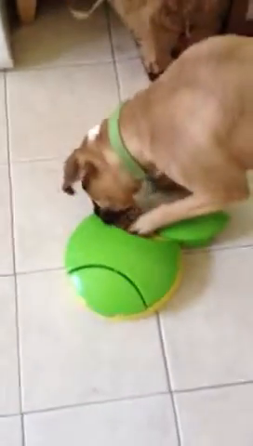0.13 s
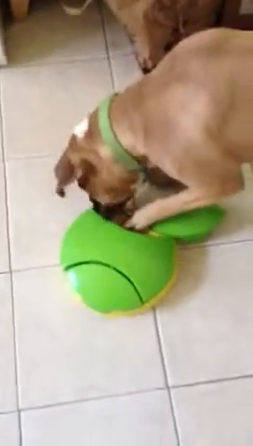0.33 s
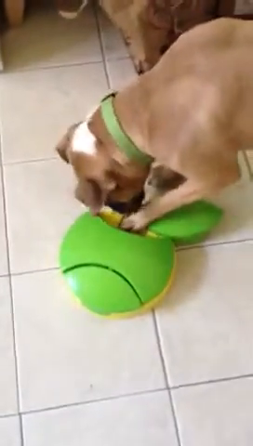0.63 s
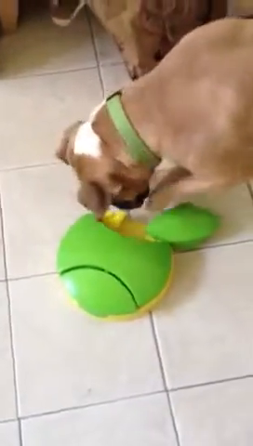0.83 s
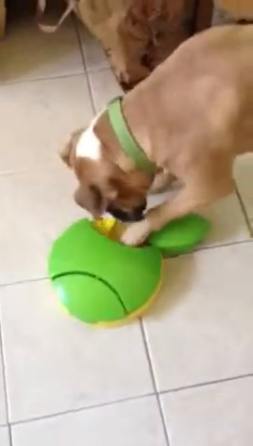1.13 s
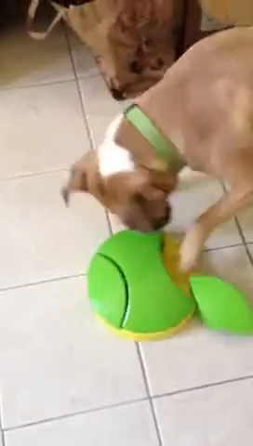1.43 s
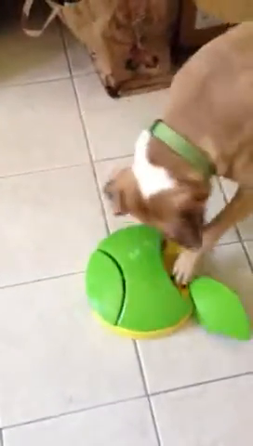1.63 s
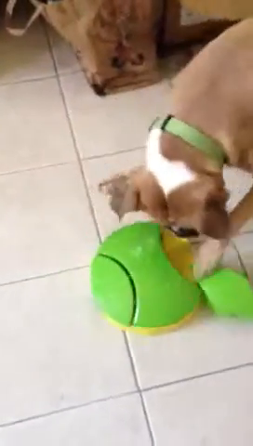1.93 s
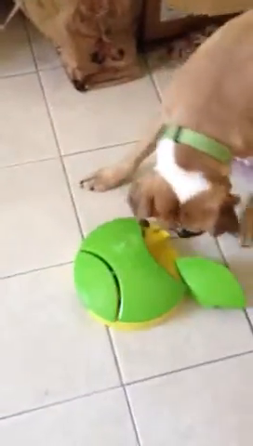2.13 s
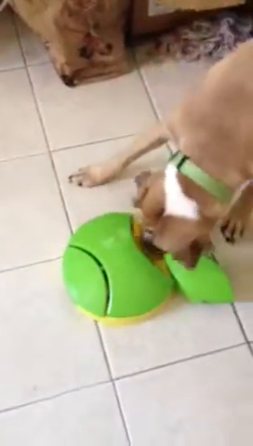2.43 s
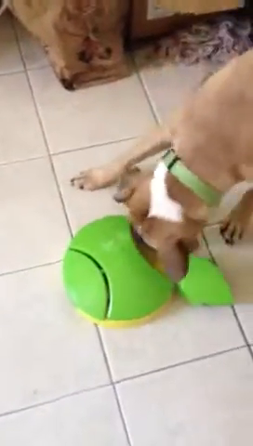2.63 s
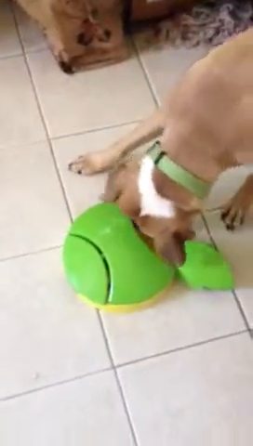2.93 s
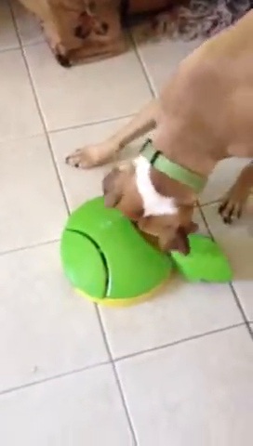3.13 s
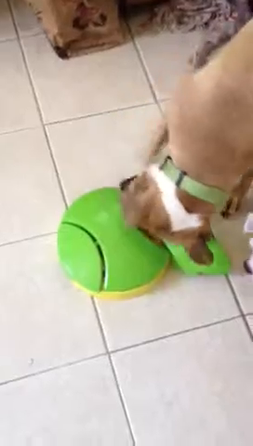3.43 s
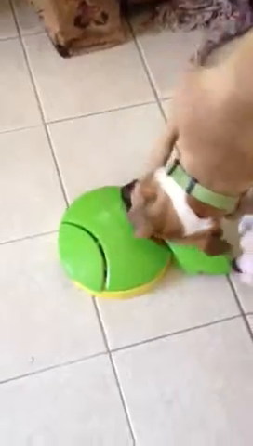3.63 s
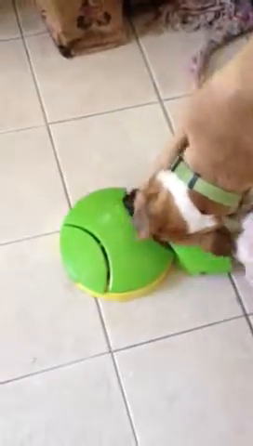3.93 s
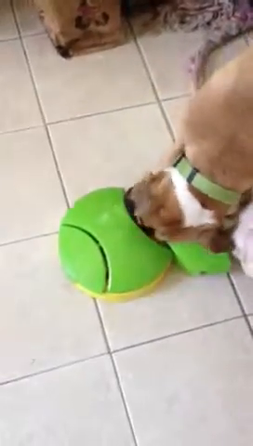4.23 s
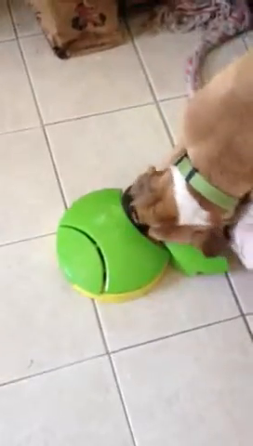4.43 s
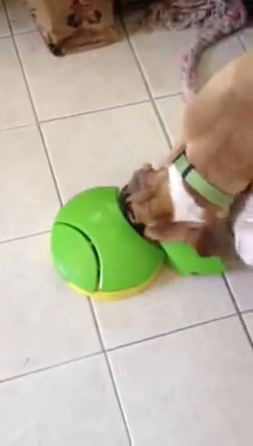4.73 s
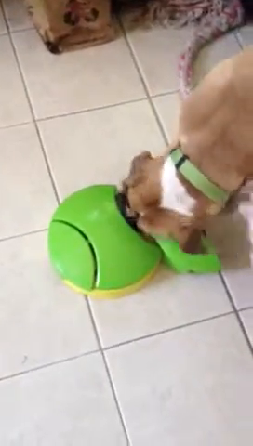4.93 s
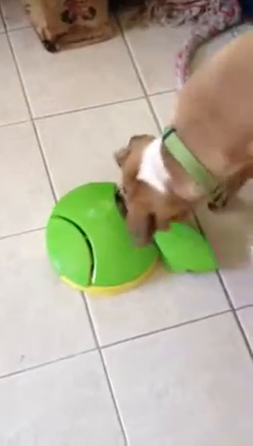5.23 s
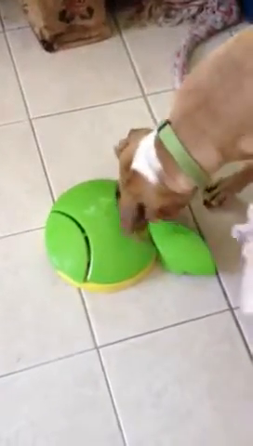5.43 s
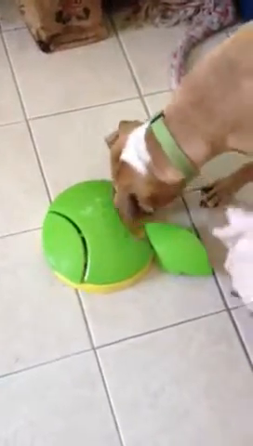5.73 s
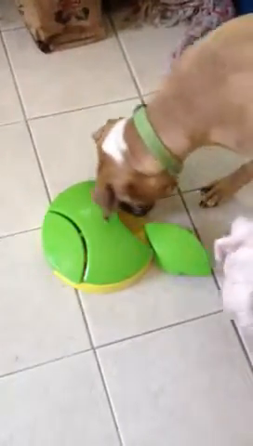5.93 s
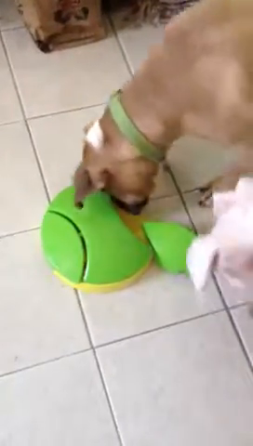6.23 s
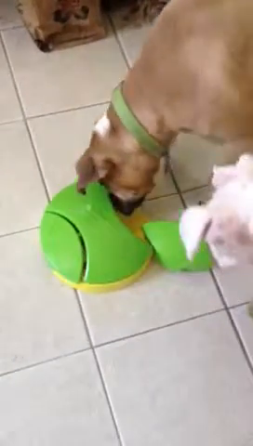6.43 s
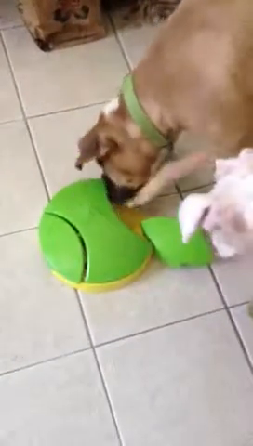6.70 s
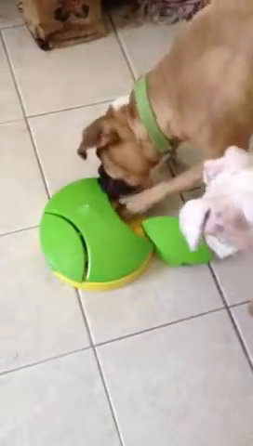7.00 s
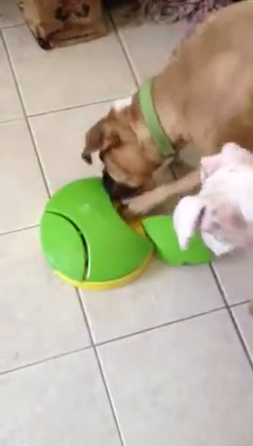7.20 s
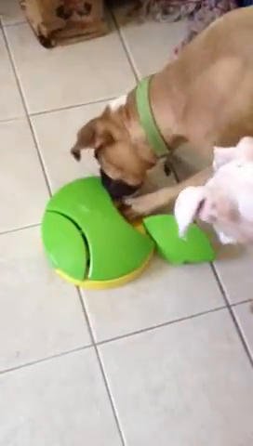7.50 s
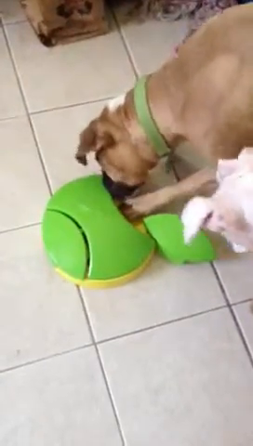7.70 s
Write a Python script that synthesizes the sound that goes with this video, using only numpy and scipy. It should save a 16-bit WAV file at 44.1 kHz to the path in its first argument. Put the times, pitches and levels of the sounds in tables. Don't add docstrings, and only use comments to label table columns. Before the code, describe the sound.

Sharp plastic knocks, claw ticks and gritty rubbing from a dog working a hollow toy on tiles, with faint collar tinkles and lively room echo.

```python
import sys
import numpy as np
from scipy import signal
from scipy.io import wavfile
from scipy.ndimage import uniform_filter1d

SR = 44100
rng = np.random.default_rng(int(sys.argv[2]) if len(sys.argv) > 2 else 0)


def to_wav(sig):
    pcm = np.clip(np.atleast_2d(sig), -1, 1) * 32767
    pcm = np.round(pcm).astype(np.int16)
    wavfile.write(sys.argv[1], SR, pcm.T)


def amp(db):
    return 10 ** (np.asarray(db, float) / 20)


N = 346626


def at_hz(points, hz):
    table_hz, values = np.transpose(points)
    return np.interp(np.log(hz), np.log(table_hz), values)


def rms_one(x):
    return x / np.sqrt(np.mean(x ** 2) + 1e-20)


def start_one(x):
    return x / np.sqrt(np.mean(x[:, :SR * 3 // 100] ** 2, axis=1, keepdims=True))


def band(x, low_hz, high_hz):
    return signal.sosfilt(signal.butter(2, [low_hz, high_hz], "band", fs=SR, output="sos"), x)


def thirds(low_hz, high_hz):
    count = round(3 * np.log2(high_hz / low_hz))
    edges = np.geomspace(low_hz, high_hz, count + 1)
    return zip(edges, edges[1:])


def drift(rate):
    knots = rng.standard_normal(N // 100)
    return np.interp(np.arange(N) / SR * 2 * rate, np.arange(len(knots)), knots)


def swells(middle_s, length_s, db):
    now = np.arange(0, N + 64, 64) / SR
    shape = np.exp(-4 * ((now - middle_s[:, None]) / length_s[:, None]) ** 2)
    return np.interp(np.arange(N) / SR, now, amp(db) @ shape)


def coloured(spectrum, low_hz, high_hz, patchy_db, grain_db):
    white = rng.standard_normal((2, N)) * amp(grain_db * drift(130))
    out, together = 0, drift(7.6)
    for k, (lo, hi) in enumerate(thirds(low_hz, high_hz)):
        flicker_db = patchy_db * (together + 1.2 * drift(9.9))
        gain = amp(at_hz(spectrum, np.sqrt(lo * hi)) + flicker_db)
        out = out + gain * band(white[k % 2], lo, hi)
    return rms_one(out)


def ring(x, hz, t60):
    radius = amp(-60 / (t60 * SR))
    turn = 2 * np.pi * hz / SR
    return signal.lfilter([0, np.sin(turn)], [1, -2 * radius * np.cos(turn), radius * radius], x + 1e-18)


def rings(rows, shake_s, split):
    out, t = np.zeros(N + SR), np.arange(SR // 2) / SR
    jiggle = np.sin(np.pi * np.minimum(t / shake_s, 1)) ** 2
    for s, db, hz, t60 in rows:
        shake = jiggle / jiggle.sum() * 2 * np.sin(2 * np.pi * hz * t)
        pair = ring(shake, hz, t60) + 0.69 * ring(shake, hz * (1 + split), t60)
        start = round(s * SR)
        out[start:start + len(t)] += amp(db) * pair
    return out[:N]


# pitch_hz, level_db (per Hz)
AIR_SPECTRUM = [(18, -61), (30, -18), (64, -42.5), (116, -6.5), (285, 1.5), (404, -14), (457, -4),
                (608, -8), (1170, -10), (1350, -16), (1910, -17), (2400, -22), (4000, -21), (5200, -51),
                (8800, -120)]
# pitch_hz, width_hz, level_db
MOTOR_HUM = [(119.8, 4.8, -78), (177.8, 9.1, -76), (290.5, 5.2, -71.5), (357.5, 4.4, -75)]


def room_tone():
    out = amp(-64) * coloured(AIR_SPECTRUM, 30.2, 1295, patchy_db=1.0, grain_db=0.3)
    for hz, width_hz, db in MOTOR_HUM:
        out += amp(db) * rms_one(ring(rng.standard_normal(N), hz, 3.8 / width_hz))
    return out


# middle_s, length_s, level_db
FINGER_SHIFTS = [(.01, 0.13, -61.5), (0.577, .07, -66), (.47, .08, -70), (0.725, 0.165, -59),
                 (.88, .1, -72), (1.02, 0.077, -63.5), (1.186, 0.061, -59), (1.75, 0.057, -68),
                 (1.55, .4, -86), (2.147, 0.079, -72), (2.565, 0.086, -74)]


def handling():
    rumble = rms_one(band(rng.standard_normal(N), 74, 190))
    return swells(*np.transpose(FINGER_SHIFTS)) * rumble


# start_s, peak_db, pitch_hz, t60_s
TAG_TINKLES = [(2.40, -72, 9400, 0.14), (2.46, -59.5, 7600, .08), (2.53, -61, 7600, .1),
               (2.58, -61.5, 7500, 0.13), (6.626, -65, 2560, 0.1), (6.636, -64, 2780, .16),
               (3.1, -63, 9400, .1), (6.655, -67, 2680, 0.2), (6.67, -70, 2880, 0.15),
               (6.645, -51.5, 7600, 0.42), (6.652, -59, 11000, 0.17), (6.6, -63, 10300, .1),
               (7.095, -55.5, 6500, 0.18)]


def tag():
    flutter = amp(3.5 * drift(45))
    return rings(TAG_TINKLES, shake_s=0.012, split=0.012) * flutter


# pitch_hz, level_db (per Hz)
RUB_SPECTRUM = [(590, -34), (1000, -7), (1440, -5.5), (1580, 1.5), (1720, -7.5), (3380, -7.5),
                (5610, -13.5), (6590, -2.5), (9410, -18.5), (14700, -21.5), (15600, -28)]
# middle_s, length_s, level_db, shell_pressure_db
RUB_STROKES = [(.13, 0.11, -59.5, -8.5), (0.283, 0.22, -52, -15), (0.54, .2, -78, 3),
               (1.007, .25, -56.5, -10), (1.37, 0.23, -64, 1.5), (1.892, 0.2, -50, -1),
               (2.12, 0.37, -70, -27), (2.47, 0.056, -80, -1), (3.01, 0.25, -72, -25),
               (3.32, 0.16, -68, -14), (3.703, 0.045, -79, -2), (3.9, 0.055, -71, -4), (4.42, 0.18, -63, 0),
               (5.417, 0.38, -71.5, 2), (5.675, 0.091, -54, -26), (6.027, 0.15, -64, -26),
               (6.285, 0.18, -71.5, -26), (6.5, 0.17, -76, -10), (6.978, 0.17, -67, -3), (7.5, .25, -72, 1)]
# middle_s, length_s, level_db
TOY_SLIDES = [(.1, 0.23, -64), (.69, 0.29, -63.5), (1.358, 0.16, -48), (1.49, .17, -57.5),
              (1.84, 0.34, -60), (3.902, .12, -67), (4.5, 0.37, -66), (5.23, 0.19, -57), (5.478, 0.19, -58),
              (6.405, .12, -67), (7.071, 0.28, -61.5), (7.8, .12, -70)]


def rubbing():
    middle_s, length_s, db, press_db = np.transpose(RUB_STROKES)
    bright = swells(middle_s, length_s, db)
    body = amp(-73) + swells(middle_s, length_s, db + press_db)
    slide = amp(-74) + swells(*np.transpose(TOY_SLIDES))
    layers = [(amp(-70.5) + bright, 4300, 9000),
              (body, 1200, 4300),
              (amp(-77) + amp(-13) * bright, 9000, 15600)]
    hiss = 0
    for gain, lo, hi in layers:
        hiss = hiss + gain * coloured(RUB_SPECTRUM, lo, hi, patchy_db=0.9, grain_db=1.0)
    drone = rms_one(ring(rng.standard_normal(N), 458, 0.068))
    groan = rms_one(sum(ring(rng.standard_normal(N), hz, 0.023) for hz in (1160, 1590, 2100)))
    return hiss + amp(-10.5) * body * groan + amp(-5.0) * slide * drone


# start_s, peak_db, pitch_hz, t60_s
SHELL_RINGS = [(.16, -56, 982, 0.22), (.724, -35, 1270, 0.088), (1.16, -48.5, 1150, 0.26),
               (1.382, -50.5, 1173, 0.51), (1.385, -50.5, 1610, 0.32), (1.10, -53, 924, .2),
               (.79, -49, 1154, 0.39), (1.86, -44.5, 1560, 0.34), (1.89, -54, 2150, 0.41),
               (1.68, -39.5, 470.6, 0.28), (2.917, -54.5, 1864, 0.15), (2.917, -58, 3480, 0.25),
               (2.917, -57, 5680, 0.35), (4.019, -43, 1550, 0.16), (5.503, -31.5, 845, 0.23),
               (5.505, -50.5, 243, 0.25), (5.505, -48.5, 165, .15), (5.503, -21, 4850, 0.17),
               (5.75, -52, 450, .4), (6.807, -54, 1800, 0.15), (6.81, -56, 2350, .2),
               (5.506, -48, 320, .25), (5.505, -42, 660, .15), (6.807, -41, 5850, 0.14),
               (4.49, -65, 1780, .3), (4.96, -51, 1506, 0.16), (7.22, -42.5, 1540, 0.22),
               (7.24, -46.5, 1183, 0.22), (7.695, -45, 1050, 0.23)]


def shell_rings():
    return rings(SHELL_RINGS, shake_s=0.0053, split=0.016)


# start_s, crack_db, then against the crack hollow_db, shell_db, rim_db
RIM_CLACKS = [
    (.16, -56.5, 0.5, 0.5, -2),
    (0.7239, -22.5, -21, -15.5, -8),
    (1.6706, -29, -22, -7, -20),
    (1.6779, -27.5, -13.5, -17, -3),
    (1.684, -37, -19, -9, -6),
    (1.8546, -33.5, -8, -10, -7),
    (4.0183, -35, -22, -11.5, -7),
    (5.5019, -18, -20.5, -13, -8),
    (5.7383, -49, -9, -11, -15),
    (6.8069, -43, -24, -10.5, -16),
]
# start_s, crack_db, then against the crack hollow_db, shell_db, rim_db
PAW_BLOWS = [(0.7161, -38.5, -3, 0.5, -4), (1.0672, -59.5, 3, 13.5, 5.5), (1.098, -45, -12, -1, -16),
             (1.1163, -32.5, -17.5, -11, -11), (1.3816, -53.5, 1.5, 12, 0), (1.8379, -36, -14, -0.5, -12.5),
             (2.0063, -42, -17, -12.5, -12.5), (3.175, -73, 4, 8, 8), (4.338, -59.5, -8.5, 2, 1.5),
             (4.9595, -47, -6.5, -3.5, -7.5), (5.498, -26, -18.5, -10, -7.5), (5.5099, -19, -29, -18, -24),
             (7.174, -59, -8, 4.5, -2.5), (7.217, -39.5, -5.5, -0.5, -3), (7.692, -46.5, 1, 5.5, -4)]
# start_s, crack_db, then against
# the crack body_db, edge_db
CLAW_TICKS = [(1.8567, -42, -23, 2), (5.5125, -30.5, -25, 2), (2.1873, -36, -28, -15.5),
              (2.32, -58.5, -24, -10), (2.918, -46, -19, -12.5), (3.02, -64, -28, -1),
              (3.424, -57.5, -32, -13), (3.57, -68, -22, -3), (3.9651, -43, -17, -13.5),
              (6.0102, -43.5, -50, -16), (6.5901, -53.5, -23, -2), (6.92, -54, -9, -31)]
# start_s, shell_db, then against the shell hollow_db, crack_db
NOSE_NUDGES = [
    (0.1012, -56, -8, -8),
    (2.827, -56.5, -1, -10.5),
    (2.835, -63, -3, 3.5),
    (3.47, -74, -7, 4),
    (3.621, -55, -4, -22),
    (4.221, -63.5, 5.5, -13),
    (5.38, -63.5, -8, -5.5),
    (6.432, -61, 1, -11),
    (7.0014, -62, 0, -2),
    (7.66, -62, 0.5, 7.5),
]


def contacts():
    s, db, hollow, shell, rim = np.transpose(RIM_CLACKS + PAW_BLOWS)
    edge = np.repeat([-10.5, -16.5], [len(RIM_CLACKS), len(PAW_BLOWS)])
    edge = edge + 0.15 * rim
    blows = np.c_[s, db + hollow, db + shell, db + rim, db, db + edge]
    s, db, body, edge = np.transpose(CLAW_TICKS)
    ticks = np.c_[s, db + body - 7, db + body, db + 0.76 * body, db, db + edge]
    s, db, hollow, crack = np.transpose(NOSE_NUDGES)
    crack = db + crack
    nudges = np.c_[s, db + hollow, db, crack - 8.5, crack, crack - 17]
    rows = np.r_[blows, ticks, nudges]
    return rows[np.argsort(rows[:, 0])]


def knock_echoes(rows, t):
    chance = rng.random((len(rows), 4, len(t)))
    arrivals = chance[:, 0] < (1500 + 32000 * t / 0.05) / SR
    sizes = amp(4.17 * -np.log(chance[:, 1] + 0.025)) * np.sign(chance[:, 2] - 0.5)
    echoes = arrivals * sizes / np.sqrt(uniform_filter1d(arrivals.mean(0), size=200))
    echoes[:, 0] = 5.1 + 0.5 * np.clip(rows[:, 4] - rows[:, 2], 0, 14)
    gap_s = np.diff(rows[:, 0], append=99)
    crack_rise_db = np.diff(rows[:, 4], append=0)
    leads_in = (gap_s < 0.045) & (gap_s > 0.005) & (crack_rise_db > 2)
    echoes[leads_in] *= 1 - np.exp(-t / (0.46 * gap_s[leads_in, None]))
    crack = (chance[:, 3, :800] - 0.5) * amp(-60 * t[:800] / 0.0055)
    crack[:, 0] = 2.63
    return signal.fftconvolve(echoes, crack, axes=1)[:, :len(t)]


PART_EDGES_HZ = [300, 700, 2200, 4500, 9000, 15800]
PART_CENTRES_HZ = [480, 1300, 3200, 6500, 11500]
PART_TRIM_DB = [-3.5, -1, -0.55, -2.1, -0.5]
# pitch_hz, level_db (per Hz)
KNOCK_SPECTRUM = [(150, -53), (250, -23.5), (442, -7), (705, -14.5), (837, -9.5), (995, -16), (1890, -3.5),
                  (2360, -4), (3010, -2.5), (6770, 2.5), (9390, -16), (11000, -9.5), (15500, -31.5)]
# pitch_hz, t60_s
ROOM_DECAY = [(300, 0.34), (600, 0.42), (1400, 0.45), (3600, 0.41), (6500, 0.38), (10000, 0.34),
              (15000, 0.24)]
# pitch_hz, level_db, t60_s
SHELL_MODES = [(441.7, 2, 0.26), (466, 0.5, 0.37), (845, -10, 0.22), (952, -11.5, .2), (1085, -16, 0.81),
               (1146, -11.5, 0.42), (1150, -17.5, 0.28), (1560, -5, 0.093), (1780, -10.5, 0.087),
               (1960, -20.5, 0.092)]


def knocks():
    rows = contacts()
    t = np.arange(SR // 2) / SR
    echoes = knock_echoes(rows, t)
    early = 1 + 1.2 * np.exp(-t / 0.098) + 0.5 * np.exp(-t / 0.007)
    levels = rows[:, 1:] + PART_TRIM_DB
    slices = np.array(list(thirds(250, 15800)))
    centres = np.sqrt(slices.prod(axis=1))
    usual_db = at_hz(KNOCK_SPECTRUM, centres) + 10 * np.log10(np.diff(slices)[:, 0])
    part = np.digitize(centres, PART_EDGES_HZ[1:-1])
    part_lift_db = levels - 10 * np.log10(np.bincount(part, amp(2 * usual_db)))
    lift_db = np.array([at_hz(np.c_[PART_CENTRES_HZ, row], centres) for row in part_lift_db])
    answer = 0
    for k, ((lo, hi), hz) in enumerate(zip(slices, centres)):
        swell = 1 - np.exp(-t * hz / 3.1 - hz / 2500)
        fade = swell * early * amp(-60 * t / at_hz(ROOM_DECAY, hz))
        low_cut_db = 3.6 * (hz < 600) + 8.0 * (hz < 400)
        gain = amp(usual_db[k] + lift_db[:, [k]] - 1.94 - low_cut_db)
        answer = answer + (-1) ** k * gain * start_one(band(echoes * fade, lo, hi))
    strike_db = 4.2 * rng.standard_normal((len(rows), len(SHELL_MODES)))
    shake = echoes * np.exp(-t / 0.0057)
    for k, (hz, db, t60) in enumerate(SHELL_MODES):
        upper = int(hz > 700)
        gain = amp(db - 5.5 + levels[:, [upper]] + strike_db[:, [k]] * upper)
        answer = answer + gain * start_one(ring(shake, hz, t60))
    out = np.zeros(N + len(t))
    for s, one in zip(rows[:, 0], answer):
        start = round(s * SR)
        out[start:start + len(t)] += one
    return out[:N]


def scene():
    toy = knocks() + shell_rings()
    toy = signal.sosfilt(signal.butter(2, 220, "high", fs=SR, output="sos"), toy)
    return (room_tone() + handling() + tag() + rubbing() + toy)[None]


def band_limit(x):
    return signal.sosfilt(signal.butter(12, 16640, fs=SR, output="sos"), x)


def record(dry):
    no_bass = signal.sosfilt(signal.butter(2, 58, "high", fs=SR, output="sos"), dry)
    port = 0.43 * signal.lfilter(*signal.iirpeak(6800, 5.0, fs=SR), no_bass)
    dip = 0.46 * signal.lfilter(*signal.iirpeak(9000, 4.0, fs=SR), no_bass)
    shaped = no_bass + port - dip
    top_cut = signal.sosfilt(signal.cheby2(10, 24, 15500, fs=SR, output="sos"), shaped)
    return band_limit(top_cut)


dry = scene()
out = record(dry)
to_wav(out)
```